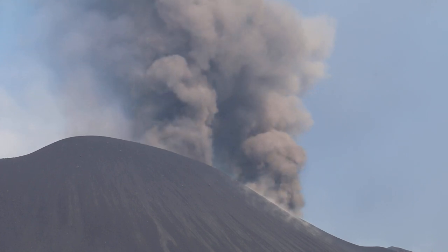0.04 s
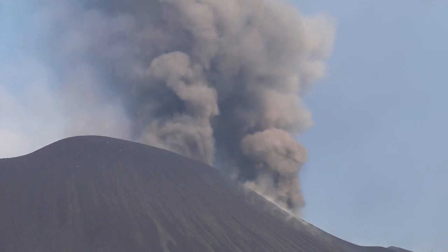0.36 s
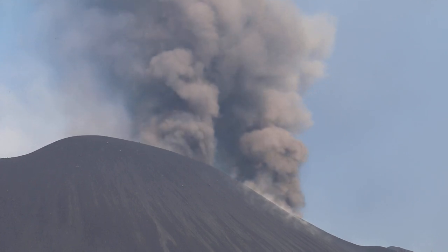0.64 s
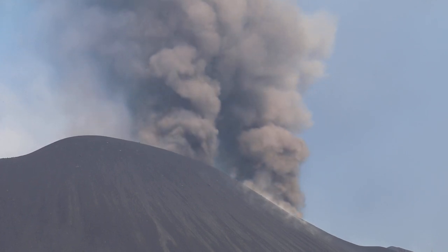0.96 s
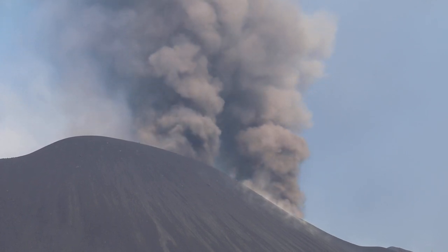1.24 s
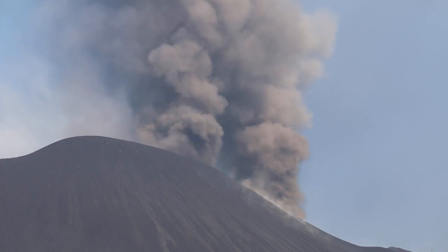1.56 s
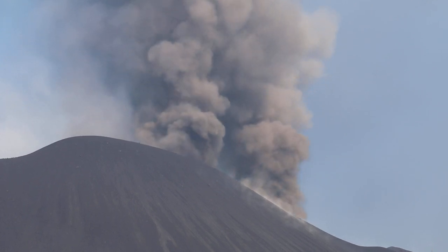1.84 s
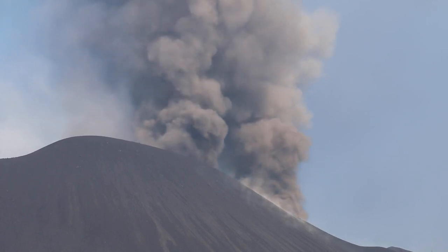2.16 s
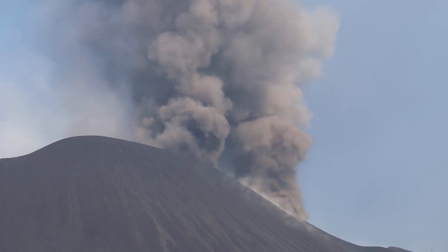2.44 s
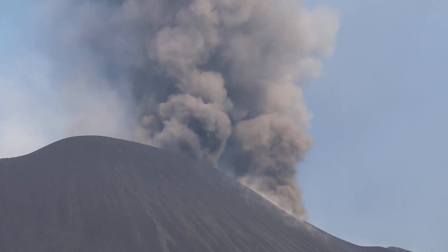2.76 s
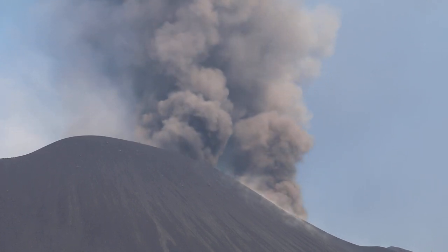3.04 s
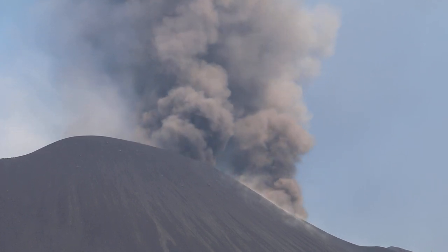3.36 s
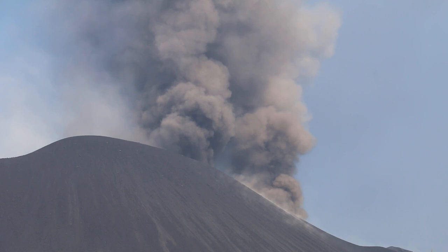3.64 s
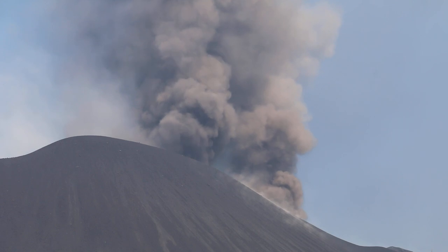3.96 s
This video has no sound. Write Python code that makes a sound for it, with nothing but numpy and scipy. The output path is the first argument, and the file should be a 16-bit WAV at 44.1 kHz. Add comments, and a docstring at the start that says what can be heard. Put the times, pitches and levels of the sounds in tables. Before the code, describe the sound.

Low, steady roar of a far-off erupting volcano, with dull thuds and light wind buffets.

```python
"""A volcano vents ash, far off in the open. From the start a turbulent jet roars over a deep rumble and
a faint hiss, while wind flaps at the two microphone ports, now one, now the other. Around 0.5-0.8 s gas
bursts thud, their treble taken by the air. The roar swells to its height near 1.6 s, with spurts rasping
inside it, the strongest at 2.3 s. Then the jet eases, the last strong bursts land near 3.5 s and the
rumble surges at the end. Throughout, a limiter ducks on the peaks."""
import sys
import numpy as np
from scipy.fft import rfft, irfft, next_fast_len
from scipy.io import wavfile
from scipy.ndimage import uniform_filter1d, map_coordinates

SR = 44100
rng = np.random.default_rng(int(sys.argv[2]) if len(sys.argv) > 2 else 0)


def master_out(mix):
    """Clip the mix to full scale and print it as 16-bit PCM to the path in sys.argv[1]."""
    frames = np.transpose(np.atleast_2d(mix))
    ceiling = np.clip(frames, -1, 1)
    pcm = np.round(ceiling * 32767).astype(np.int16)
    wavfile.write(sys.argv[1], SR, pcm)


N = 176400


def amp(db):
    """Decibels to gain."""
    return 10 ** (np.asarray(db) / 20)


def unit(x):
    """Scale to rms 1."""
    return x / np.sqrt(np.mean(x ** 2) + 1e-20)


def eq_gain(colour, hz):
    """Gain of an EQ curve, its (Hz, dB) points joined on a log frequency axis."""
    freqs, db = np.transpose(colour)
    return amp(np.interp(np.log(hz + 1), np.log(freqs + 1), db))


def fader(ride):
    """One gain per sample from (s, dB) points."""
    return amp(np.interp(np.arange(N) / SR, *np.transpose(ride)))


def wobble(rate):
    """A smooth random curve, rate knots a second."""
    return map_coordinates(rng.standard_normal(1024), [np.arange(N) * rate / SR], mode="wrap")


def filtered(x, response):
    """Shape the spectrum of x by a response of frequency."""
    m = next_fast_len(N + SR // 2)
    return irfft(rfft(x, m) * response(np.fft.rfftfreq(m, 1 / SR)), m)[..., :N]


# Stereo width from sound scattered at the sides (frequency [Hz], side over centre [dB])
SIDE_SCATTER = [(30, -14), (60, -13.5), (100, -17.5), (170, -15.5), (260, -27.5), (400, -30), (800, -20.5),
                (1000, -22.5), (1200, -14), (1700, -16), (2600, -13.5), (3500, -2.5)]


def rush(colour, width=SIDE_SCATTER):
    """Stereo turbulence of rms 1: a centre and an unrelated side."""
    mid = filtered(rng.standard_normal(N), lambda hz: eq_gain(colour, hz))
    side = filtered(rng.standard_normal(N), lambda hz: eq_gain(colour, hz) * eq_gain(width, hz))
    return unit(np.array([mid + side, mid - side]))


# Fader ride of the hiss bed (time [s], level [dB])
HISS_RIDE = [(0, -65), (.33, -61), (.55, -60.5), (.65, -62), (1.1, -63), (1.4, -61), (1.75, -63),
             (2.0, -61), (2.25, -61), (2.4, -62.5), (2.6, -60.5), (4, -61)]
# Its airy tone (frequency [Hz], level [dB])
HISS_EQ = [(500, -10.5), (3000, -0.5), (4500, 1), (7500, -1.5), (11000, -4), (15500, -9)]


def hiss(side_db=0.5):
    """A faint, wide hiss that rises and falls a little."""
    return fader(HISS_RIDE) * rush(HISS_EQ, width=[(1000, side_db)])


# Wind hits on the microphone (centre time [s], length [s], level [dB], left share of power [0-1])
WIND_HITS = [(0.052, 0.048, -15, 1), (0.378, 0.018, -9, 0.95), (0.59, 0.029, -17.5, 0.05),
             (0.616, 0.013, -5, 0.97), (0.779, 0.018, -19, 0.13), (0.812, 0.034, -9.5, 0.5),
             (1.022, 0.018, -12, 0.04), (1.72, 0.035, -17, 0.2), (2.036, 0.027, -13, 0.6),
             (2.219, 0.011, -11.5, 0.9), (2.335, 0.018, -15.5, 0.3), (2.369, 0.018, -14, 0.05),
             (2.562, 0.04, -19.5, 0.96), (2.85, 0.014, -14.5, 0.9), (3.383, 0.015, -19, 0.84)]
# Boomy tone of wind on a port (frequency [Hz], level [dB])
WIND_EQ = [(15, -21.5), (45, -11.5), (85, -2.5), (130, 3.5), (200, -6.5), (300, -6.5), (420, -21),
           (580, -24.5), (750, -31.5), (1200, -47.5), (3000, -90)]


def wind(hit_db=1, wake_db=-17, wake_stretch=5.3, flutter_db=-37, swing_db=6, flutter_rate=24):
    """Eddies strike each port on its own: short buffets in a longer, softer wake, over a weak flutter."""
    t = np.arange(N) / SR
    flutter = np.array([wobble(flutter_rate), wobble(flutter_rate)])
    power = amp(flutter_db + swing_db * flutter) ** 2
    for centre, length, db, left in WIND_HITS:
        offset = 2 * (t - centre) / length
        buffet = 0.5 ** (offset ** 2)
        wake = amp(wake_db) ** 2 * 0.5 ** ((offset / wake_stretch) ** 2)
        power += np.outer([left, 1 - left], amp(db + hit_db) ** 2 * (buffet + wake))
    port_noise = filtered(rng.standard_normal((2, N)), lambda hz: eq_gain(WIND_EQ, hz))
    return np.sqrt(power) * unit(port_noise)


# Fader ride of the sub layer (time [s], level [dB])
SHUDDER_RIDE = [(0, -24.5), (.15, -25.5), (.45, -23.5), (.9, -30.5), (1.4, -27), (1.8, -29.5), (2.2, -32.5),
                (2.8, -29), (3.3, -31), (3.65, -23), (4, -30.5)]
# Its sub-bass tone (frequency [Hz], level [dB])
SHUDDER_EQ = [(10, -35.5), (22, -13.5), (32, -9), (42, -3.5), (50, -0.5), (65, -12.5), (120, -42),
              (500, -100)]


def shudder():
    """The vent's deepest shudder, heaving slowly below the rumble."""
    return fader(SHUDDER_RIDE) * rush(SHUDDER_EQ)


# Surges of the rumble (time [s], level [dB])
RUMBLE_RIDE = [(0, -27.5), (0.25, -23.5), (0.35, -21.5), (0.44, -23), (0.54, -19.5), (0.72, -25),
               (0.95, -24), (1.2, -21), (1.45, -25), (1.61, -18), (1.85, -26.5), (2.0, -19.5), (2.2, -28),
               (2.42, -16.5), (2.72, -24), (3.15, -21.5), (3.66, -18.5), (3.83, -25), (3.98, -15)]
# Its bass weight (frequency [Hz], level [dB])
RUMBLE_EQ = [(25, -31), (42, -12), (56, -2.5), (75, 1.5), (100, -3), (135, -7), (220, -32), (800, -100)]


def rumble(gain_db=-1.5):
    """The vent rumbles in deep surges."""
    return amp(gain_db) * fader(RUMBLE_RIDE) * rush(RUMBLE_EQ)


# Swells in the body of the roar (time [s], level [dB])
BODY_RIDE = [(0, -20), (0.25, -25.5), (0.42, -22.5), (0.57, -18.5), (0.72, -24), (0.92, -22), (1.2, -21),
             (1.46, -17.5), (1.68, -17), (1.9, -18.5), (2.22, -19.5), (2.42, -21), (2.62, -19),
             (2.85, -21.5), (3.05, -23), (3.33, -23.5), (3.55, -23), (3.75, -23.5), (3.95, -23)]
# Its upper-bass tone (frequency [Hz], level [dB])
BODY_EQ = [(50, -30), (110, -7), (140, -5), (185, -1), (230, -2.5), (290, -8.5), (450, -27.5), (1500, -100)]


def body(gain_db=-1.5):
    """The plume's large eddies swell and sink, giving the roar its body."""
    return amp(gain_db) * fader(BODY_RIDE) * rush(BODY_EQ)


# Fader ride of the growl (time [s], level [dB])
GROWL_RIDE = [(0, -32), (0.27, -26.5), (0.8, -28.5), (1.12, -35.5), (1.23, -26.5), (1.52, -29.5),
              (1.6, -22), (1.8, -28.5), (2.28, -25.5), (2.42, -32.5), (2.55, -26), (2.65, -23.5),
              (2.82, -27), (3.15, -30.5), (4, -28)]
# Its low-mid tone (frequency [Hz], level [dB])
GROWL_EQ = [(200, -35), (305, -1), (365, -1.5), (500, -17), (1200, -88.5)]


def growl():
    """The plume's smaller eddies growl above the body."""
    return fader(GROWL_RIDE) * rush(GROWL_EQ)


# Cues for the gas spurts (centre time [s], level [dB])
SPURT_CUES = [(0.24, -35.5), (1.22, -38.5), (1.601, -32.5), (1.68, -35), (2.0, -34), (2.3, -30)]
# Their midrange bite (frequency [Hz], level [dB])
SPURT_EQ = [(500, -28.5), (1020, 0), (1200, -8), (1800, -7.5), (2500, -23), (5000, -68.5)]


def spurts(length_s=0.054):
    """Brief pushes of faster gas rasp inside the roar."""
    t = np.arange(N) / SR
    swells = sum(amp(db) * 0.5 ** ((2 * (t - centre) / length_s) ** 2) for centre, db in SPURT_CUES)
    return swells * rush(SPURT_EQ)


# Cues for the strongest gas bursts (time [s], level [dB])
BURST_CUES = [(0.476, -3), (0.536, -4), (0.658, -2.5), (0.828, -4), (1.454, 0), (1.69, -4), (2.318, -3.5),
              (3.45, -2.5), (3.65, -4.5), (3.699, -2.5)]


def bursts(cue_db=-4, puff_count=260, puff_db=-7.5, spread_db=1.5, rise_s=0.00042, fall_s=0.002,
           air_hz=900, low_cut_hz=35):
    """Each gas burst is a push of pressure and a longer suction, dulled by the air."""
    t, track = np.arange(SR // 20) / SR, np.zeros(N + SR)
    # Small puffs fall at random among the cued hits and follow the jet's fader.
    puff_times = rng.uniform(0, N / SR, puff_count)
    puff_levels = np.interp(puff_times, *np.transpose(JET_RIDE)) + puff_db
    puff_levels += spread_db * rng.standard_normal(puff_count)
    hits = [(start, db + cue_db) for start, db in BURST_CUES]
    for start, db in list(zip(puff_times, puff_levels)) + hits:
        age = t / (fall_s * np.exp(0.18 * rng.standard_normal()))  # each has its own length
        attack = 1 - np.exp(-t / rise_s)
        pulse = attack * (1 - age) * np.exp(-age)
        track[round(start * SR):][:len(t)] += amp(db) * pulse / pulse.max()

    def thud_eq(hz):
        low_cut = 1j * hz / (low_cut_hz + 1j * hz)
        return low_cut / np.sqrt(1 + (hz / air_hz) ** 8)
    return filtered(track, thud_eq)


# Fader ride of the ash jet (time [s], level [dB])
JET_RIDE = [(0, -26), (0.2, -24), (0.35, -22), (0.58, -22.5), (0.8, -23), (1.03, -25), (1.22, -22),
            (1.43, -20), (1.65, -20.5), (1.82, -22), (2.0, -21), (2.15, -22.5), (2.31, -22.5),
            (2.45, -23.5), (2.62, -22.5), (3.0, -24), (3.4, -25.5), (3.75, -24)]
# Its distant tone, the top taken off by the air (frequency [Hz], level [dB])
JET_EQ = [(120, -32.5), (240, -12.5), (325, -5.5), (444, -5.5), (515, -1.5), (677, -9), (830, -7),
          (940, -8), (1005, -5), (1060, -11.5), (1170, -17.5), (1320, -14.5), (1460, -22), (1700, -17.5),
          (2000, -25), (2600, -32), (3050, -43), (3800, -57), (6000, -100)]


def jet(gain_db=-1.04, churn_db=0.5, churn_rate=40, speed_wander=0.00694, wander_rate=9):
    """The ash jet's broad roar, stirred by small eddies; its pitch wanders with the speed of the gas."""
    playhead = np.arange(N) + np.cumsum(speed_wander * wobble(wander_rate))
    roar = np.array([map_coordinates(channel, [playhead], mode="mirror") for channel in rush(JET_EQ)])
    churn = amp(churn_db * wobble(churn_rate))
    return amp(gain_db) * fader(JET_RIDE) * churn * roar


def scene(pan_db=0.17):
    """The mix: the eruption ahead, a hair to the right, and wind at the microphone."""
    eruption = jet() + spurts() + body() + growl() + rumble() + shudder() + bursts()
    return (eruption + hiss()) * amp([[-pan_db], [pan_db]]) + wind()


def record(dry, threshold_db=-5, release_s=0.033, top_hz=15750):
    """Master chain: a limiter ducks both channels on a peak and recovers, then a brick-wall high cut."""
    peak = np.abs(dry).max(axis=0)
    overshoot = np.log(np.maximum(peak / amp(threshold_db), 1))
    release = np.arange(N) / SR / release_s
    # Each overshoot decays until a bigger one takes over.
    held = np.exp(np.maximum.accumulate(np.log(overshoot + 1e-12) + release) - release)
    duck = uniform_filter1d(uniform_filter1d(held, size=200), size=200)  # softens the attack
    return filtered(dry * np.exp(-duck), lambda hz: hz < top_hz)


dry = scene()
out = record(dry)
master_out(out)
```